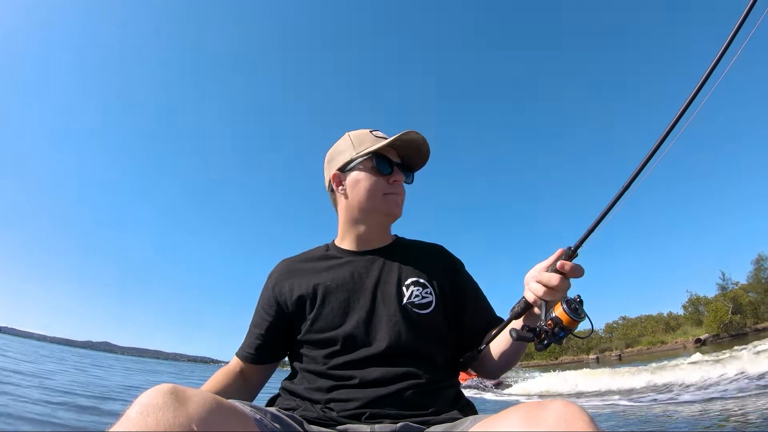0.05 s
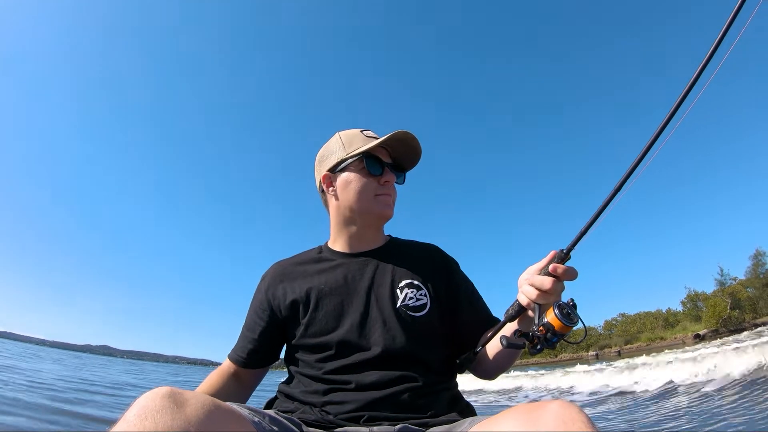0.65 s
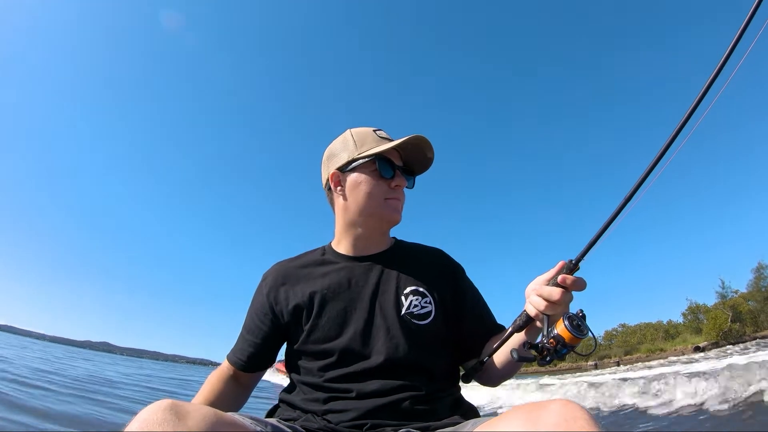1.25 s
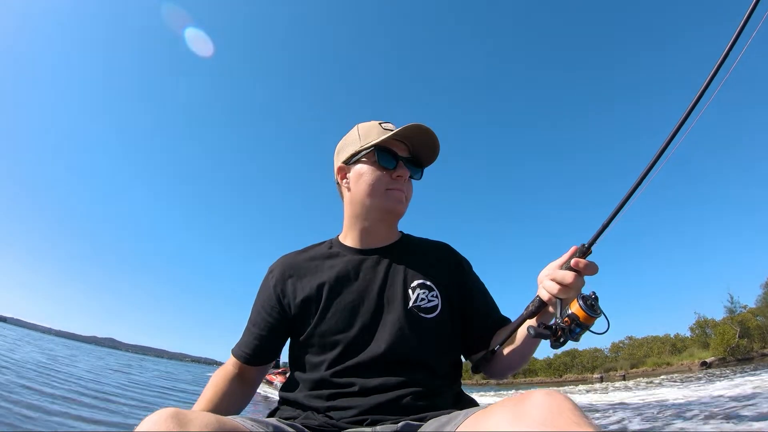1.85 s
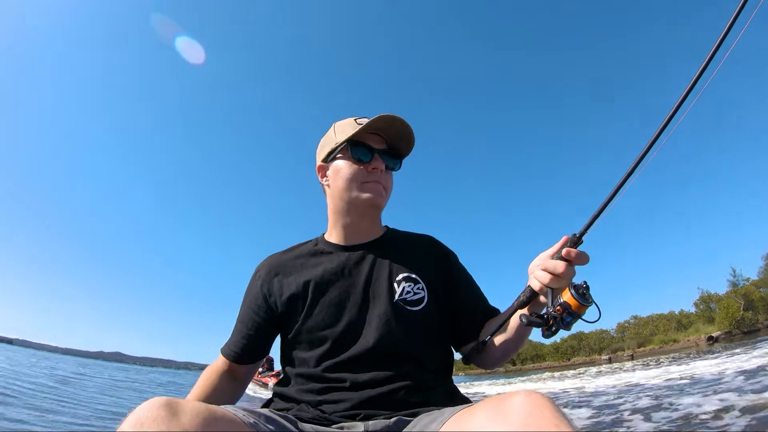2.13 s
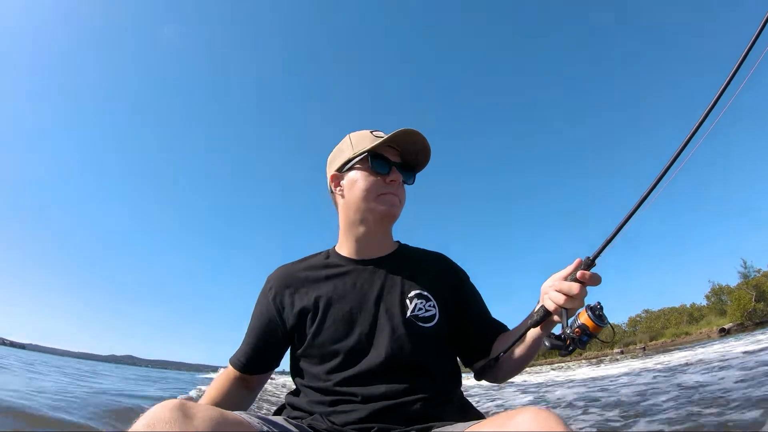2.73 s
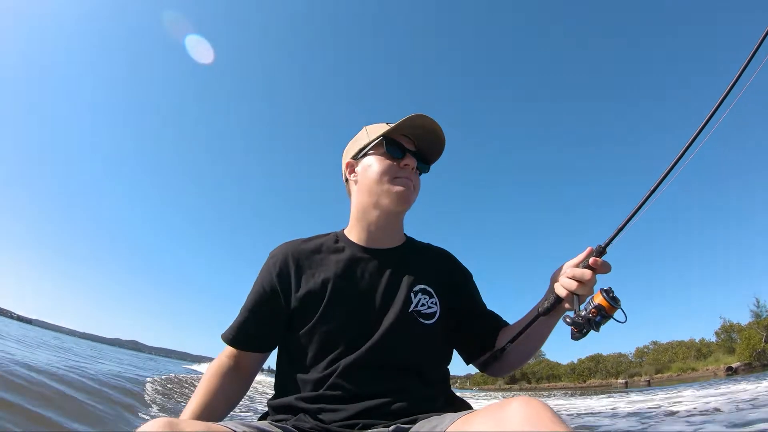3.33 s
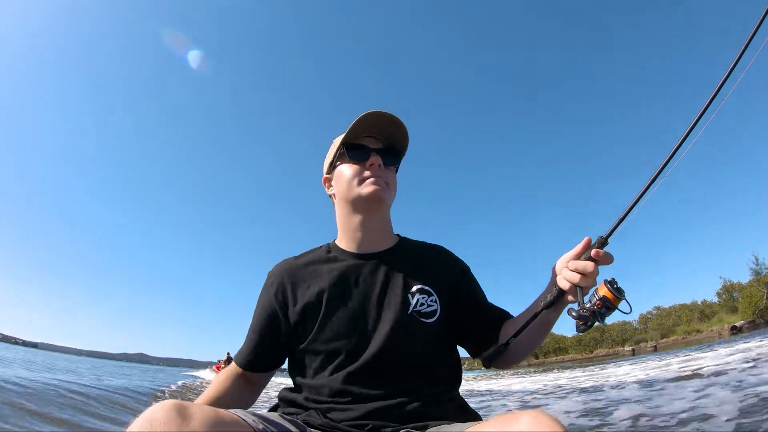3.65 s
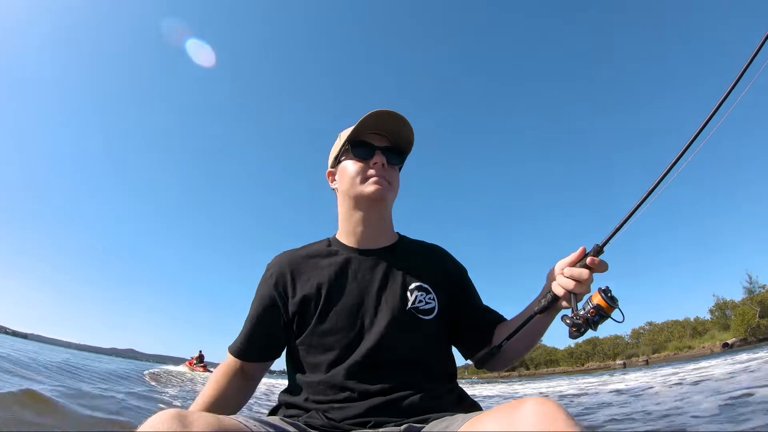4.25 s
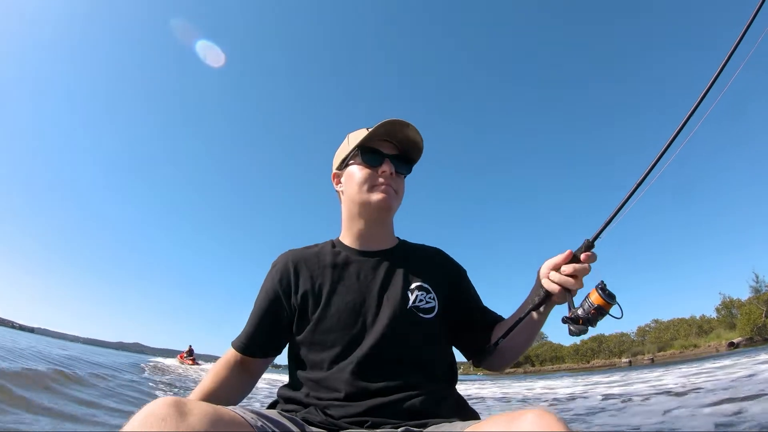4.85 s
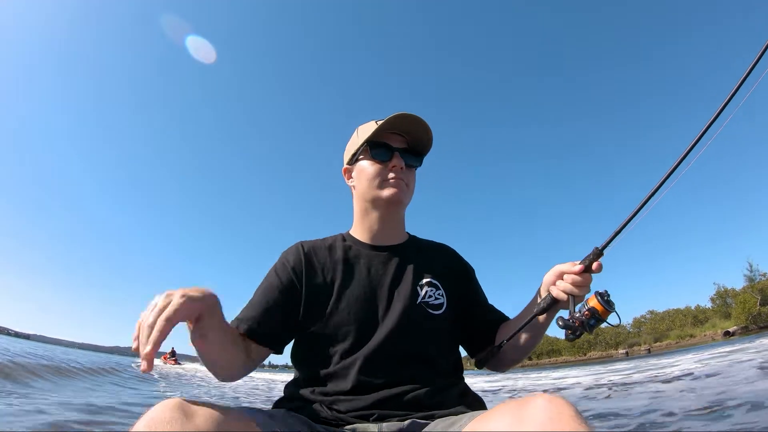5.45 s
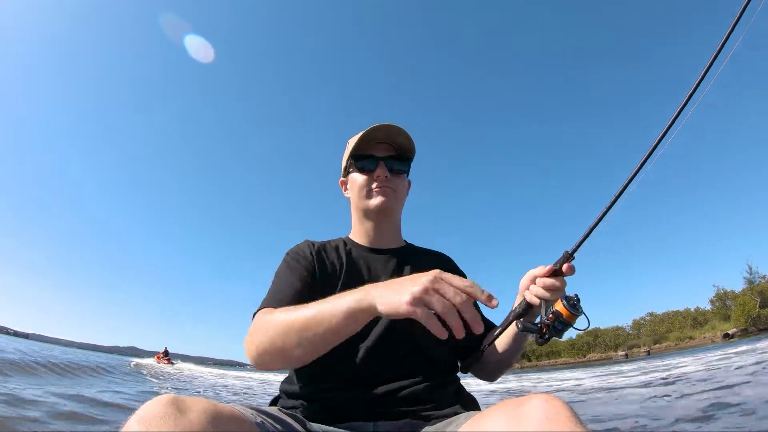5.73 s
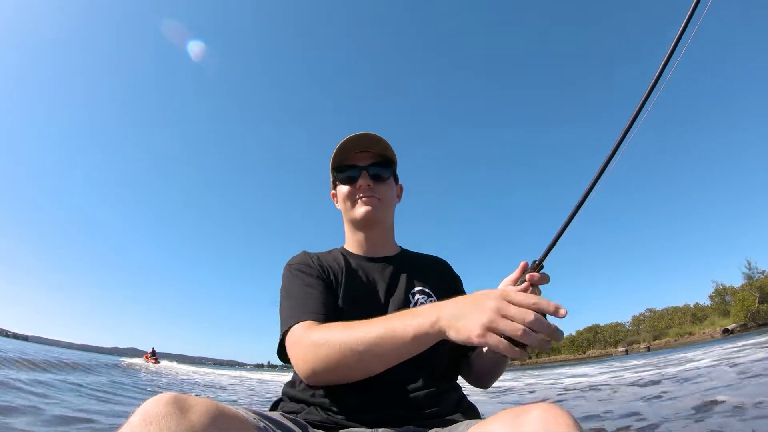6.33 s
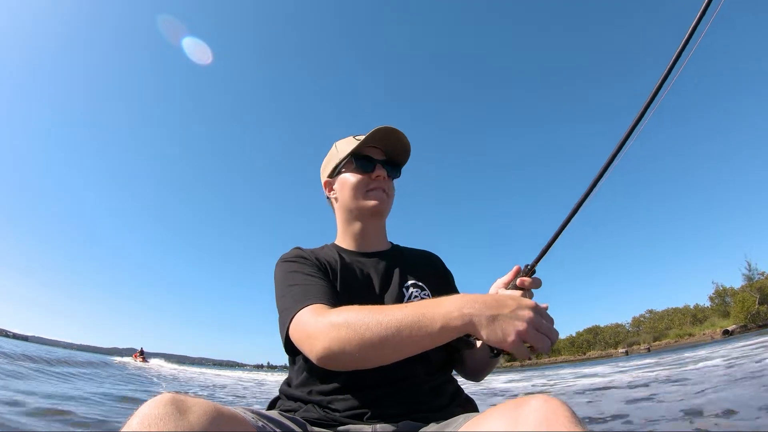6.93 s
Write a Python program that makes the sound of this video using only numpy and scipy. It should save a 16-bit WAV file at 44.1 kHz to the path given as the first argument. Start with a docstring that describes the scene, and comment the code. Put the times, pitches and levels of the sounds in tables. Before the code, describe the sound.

A passing jet ski hums and burbles into the distance, leaving a fizzing wake, while wind rumbles softly and a small bird trills.

```python
"""Jet ski passing a kayak

A three-cylinder jet ski passes close behind a drifting kayak and speeds off over open water, its
exhaust burbling through the water. Spray roars and hisses from left to right and leaves a fizzing
wake; the jet whistles briefly. A second engine drones farther away. Wind nudges the microphone,
small birds call and trill on the bank and a fishing reel clicks once."""
import sys
import numpy as np
from scipy import signal
from scipy.fft import rfft, irfft, next_fast_len
from scipy.io import wavfile
from scipy.ndimage import uniform_filter1d, minimum_filter1d

SR = 44100
rng = np.random.default_rng(int(sys.argv[2]) if len(sys.argv) > 2 else 0)


def inscribe(sig):
    """Save sig as 16-bit PCM at rate SR to the path in sys.argv[1].

    A 1-D sig is mono; a 2-D sig holds one channel per row.
    Samples are clipped to [-1, 1] before scaling.
    """
    pcm = np.round(np.clip(np.atleast_2d(sig).T, -1, 1) * 32767)
    wavfile.write(sys.argv[1], SR, pcm.astype(np.int16))


N = 312669
TIME = np.arange(N) / SR


def jet_ski():
    """Three firings per cycle give the strong lines; unequal cylinders fill in between."""
    # firing rate: t/s, f/Hz
    firing_rate = [(0, 90.2), (1.3, 91.5), (2.5, 92.7), (3.1, 95.2), (4, 98.1), (4.95, 99.6), (5.4, 98.6),
                   (5.8, 99.5), (6.15, 99.2), (7.09, 104.4)]
    # weak lines: cycle order, level/dB re a firing harmonic, number of that harmonic
    weak_lines = [(2, -24, 1), (4, -23, 1), (5, -40.5, 1), (7, -21, 1), (8, -6, 4), (10, -20.5, 4),
                  (11, -8.5, 4), (13, -27, 4), (14, -20.5, 3), (18, -37, 1), (21, -41, 1), (24, -32.5, 1)]
    firings = np.cumsum(curve(firing_rate)) / SR
    cycles = firings / 3
    levels_db = exhaust_levels_db()
    note = sum(gain_of(db) * partial(firings, k + 1, flutter=0.052) for k, db in enumerate(levels_db))
    note += sum(gain_of(db + levels_db[round(k) - 1]) * partial(cycles, order, flutter=0.26)
                for order, db, k in weak_lines)
    # only the shorter waves differ between the ears
    side = colour(note, [(100, -49), (280, -30), (370, -19), (550, -17.5)])
    # gas noise rings the pipe resonance that lifts harmonic 4
    resonance = [(80, -48), (220, -27), (320, 0), (390, 10), (425, -4.5), (480, -21.5), (1300, -110)]
    pipe = spread(noise_pair(), resonance) * gain_of(levels_db[3] - 13)
    return np.array([note + side, note - side]) + pipe


def exhaust_levels_db(broadside_m=9.6, stern_at_m=33.2, stern_reach_m=7.3, bounce_db=0.34):
    """Firing harmonics: 1-3 fade with distance and have broadside and stern lobes; 4 rings the pipe."""
    # harmonics 1-3: level/dB, loss/dB per distance doubling, broadside lobe/dB, stern lobe/dB
    harmonics = [(-11.5, 3, 0.85, 1.4), (-24.5, 1.14, 6.5, -1.5), (-35, 0.8, 16, 6.5)]
    # harmonic 4: t/s, level/dB
    pipe_level = [(0, -23), (.5, -30), (1, -32), (1.25, -24.5), (2.4, -24), (3.6, -29), (4.05, -36.5),
                  (5.3, -34), (7.09, -45)]
    along_m, doublings = course()
    broadside = np.exp(-(along_m / broadside_m) ** 2)
    stern = np.exp(-((along_m - stern_at_m) / stern_reach_m) ** 2)
    lower_db = [db + bounce_db * bounce() - loss_db * doublings + side_db * broadside + stern_db * stern
                for db, loss_db, side_db, stern_db in harmonics]
    return lower_db + [curve(pipe_level)]


def course(lag_s=0, pass_s=0.24, closest_m=13.64, speed_m_per_s=9.6):
    """Straight run: metres past the closest point, and doublings of the distance."""
    along_m = speed_m_per_s * (TIME - pass_s - lag_s)
    return along_m, np.log2(np.hypot(along_m, closest_m) / closest_m)


def bounce(landing_s=0.12, period_s=1.128):
    """Hull bouncing over the swell: -1 airborne, 1 on landing."""
    return np.cos(2 * np.pi * (TIME - landing_s) / period_s)


def burble():
    """Exhaust gas breaks through the water in low, irregular gulps."""
    # gulp spectrum: f/Hz, level/dB
    spectrum = [(20, -36.5), (45, -16), (75, -1), (115, -2), (160, -4), (280, -3), (340, -7), (410, -14),
                (460, -24), (600, -38.5), (1000, -79)]
    # envelope: t/s, level/dB
    level = [(0, -20), (1.3, -22.5), (2, -25), (2.8, -26.5), (3.6, -26.5), (4.5, -28), (5.5, -26.5),
             (7.09, -28)]
    gulps = noise_pair() * gain_of(1.17 * drift(16))
    return gain_of(curve(level)) * spread(gulps, spectrum)


def spray(wake_roar_db=-33.5, wake_roar_db_per_db=0.18):
    """Thrown water roars and hisses, then leaves a duller wake whose crest rolls towards the kayak."""
    # spray roar: f/Hz, level/dB
    roar_spectrum = [(200, -27.5), (400, 4.5), (500, -5.5), (620, 2), (770, 1.5), (900, -1.5), (1100, 1),
                     (1300, -3.5), (1600, -1), (2100, -10), (3200, -25), (10000, -84.5)]
    # wake roar: f/Hz, level/dB
    wake_spectrum = [(200, -37), (400, -5.5), (490, -4), (620, 1), (690, -1.5), (760, 2), (900, -4),
                     (1050, -3.5), (1250, -7), (1550, -9), (2100, -17.5), (3200, -28.5), (10000, -95)]
    # hiss of both: f/Hz, level/dB
    hiss_spectrum = [(700, -28.5), (1400, 0), (1900, 3), (2300, -1.5), (2700, 0), (3400, -4), (4200, -11),
                     (5500, -23), (9000, -28), (11500, -42), (15500, -59)]
    # hiss of the breaking crest: t/s, level/dB
    crest_level = [(0, -48.5), (2.2, -49.5), (3.5, -58.5), (4.7, -53.5), (5.4, -46), (6.4, -45.5),
                   (7.09, -50)]
    crest_db = curve(crest_level)
    wake_db = wake_roar_db + wake_roar_db_per_db * (crest_db - crest_db.mean())
    wake = gain_of(wake_db) * spread(noise_pair(), wake_spectrum)
    roar_gain = spray_gain(db=-28, db_per_doubling=11.5, lag_s=-0.12, surge_db=1.2)
    roar = (roar_gain * spread(noise_pair(), roar_spectrum) + wake) * gain_of(0.5 * drift(4.7))
    hiss_gain = spray_gain(db=-36.5, db_per_doubling=18.5, lag_s=0.13, surge_db=2.5)
    hiss = spread(droplets(per_s=2000, size_db=3, wash=1.1), hiss_spectrum) * gain_of(0.77 * drift(20))
    hiss *= np.hypot(hiss_gain, gain_of(crest_db))
    return panned(roar + hiss, water_pan_db())


def spray_gain(db, db_per_doubling, lag_s, surge_db):
    """Spray fades with distance and surges at each landing of the hull."""
    return gain_of(db - db_per_doubling * course(lag_s)[1] + surge_db * bounce())


def water_pan_db(near_db=7, far_db=-3.5):
    """Water sounds cross from left to right as the craft draws away."""
    nearness = 0.5 ** (2 * course()[1])
    return far_db + (near_db - far_db) * nearness


def splashes():
    """Sheets of spray fall back in grainy swells."""
    # sheets: t/s, level/dB, length/s
    sheets = [(1.3, -46, 0.28), (1.831, -40, 0.1), (1.917, -44, .1), (2.249, -39.5, 0.091)]
    envelope = np.zeros(N)
    for s, db, length_s in sheets:
        u = np.arange(SR) / SR / (length_s / 4)
        add(envelope, s, gain_of(db) * u * np.exp(1 - u))
    spectrum = [(200, -42), (800, -21), (2000, 0.5), (3000, -0.5), (5000, -9), (9000, -19.5),
                (11500, -41), (15000, -48)]
    return envelope * spread(droplets(per_s=2000, size_db=4.5, wash=0.93), spectrum)


def foam(gain_db=3, pan_share=0.3):
    """Tiny bubbles burst all over the wake."""
    # fizz: f/Hz, level/dB
    spectrum = [(1500, -12), (3000, 3), (4200, 2), (5500, -1.5), (7000, -1), (9200, -2.5), (10100, -9.5),
                (11300, -19.5), (13000, -22.5), (15500, -29)]
    # envelope: t/s, relative level/dB
    level = [(0.05, -48), (1.47, -51), (1.66, -53.5), (2.26, -53), (3.06, -56.5), (3.72, -54),
             (4.24, -56.5), (5.06, -53), (6.3, -51), (7.02, -56)]
    fizz = spread(droplets(per_s=2500, size_db=1.5, wash=1.8), spectrum)
    fizz *= gain_of(curve(level) + gain_db + 0.66 * drift(23))
    return panned(fizz, pan_share * water_pan_db())


def mist(db=-54, peak_s=0.35, fade_db_per_s=7):
    """The finest drops crackle while the craft is near; air soon absorbs their treble."""
    spectrum = [(200, -62.5), (5000, -18.5), (8000, -2), (9200, 3.5), (10200, -2), (11200, -13),
                (13000, -11), (15500, -22.5)]
    crackle = spread(droplets(per_s=1100, size_db=5.5, wash=0.8), spectrum)
    return crackle * gain_of(db - fade_db_per_s * abs(TIME - peak_s) + 2 * drift(12))


def whistle(level_db=-51, hold_from_s=2.6, hold_to_s=2.87, rise_db_per_s=19, fall_db_per_s=23):
    """Rushing water rings the jet's narrow resonances, heard while the nozzle faces the kayak."""
    # resonances: f/Hz, width/Hz, relative level/dB
    resonances = [(3650, 500, -2), (4600, 380, -1.5), (6760, 600, -12)]
    rush, tone = rng.standard_normal(N), np.zeros(N)
    for hz, width_hz, db in resonances:
        pole = resonator(hz, width_hz)
        tone += gain_of(db) * evened(signal.lfilter([1], np.convolve(pole, pole), rush).real)
    envelope_db = level_db - rise_db_per_s * np.maximum(hold_from_s - TIME, 0)
    envelope_db -= fall_db_per_s * np.maximum(TIME - hold_to_s, 0)
    return panned(tone * gain_of(envelope_db + 0.74 * drift(17)), pan_db=3)


def far_engine():
    """A second engine's lumpy drone beats against the jet ski's note."""
    # cycle rate: t/s, f/Hz
    cycle_rate = [(0, 18.65), (2, 18.4), (3.5, 18.13), (5, 17.95), (6, 17.79), (7.09, 17.71)]
    # envelope: t/s, level/dB
    level = [(0, -27.5), (1.5, -32), (3, -24), (4.5, -22), (7.09, -19.5)]
    # lines: cycle order, relative level/dB
    lines = [(3, -24.5), (4, -13), (5, -1.5), (6, -14), (7, -0.5), (8, -12), (10, -18), (13, -18.5),
             (14, -23), (17, -21), (19, -22)]
    cycles = np.cumsum(curve(cycle_rate)) / SR
    note = sum(gain_of(db) * partial(cycles, order, flutter=0.16) for order, db in lines)
    return gain_of(curve(level)) * note


def wind(breeze_db=-37):
    """Low pressure rumble, partly different at each microphone port; gusts swell over a breeze."""
    # rumble: f/Hz, level/dB
    spectrum = [(10, -25.5), (22, 0.5), (30, 6), (55, 6), (80, 4.5), (140, 5), (400, -55), (1500, -110)]
    # gusts: peak t/s, level/dB, length/s
    gusts = [(2.97, -24.5, 1), (4.094, -22.5, 1), (4.903, -25, 0.6), (5.424, -31, 0.93)]
    mid, side = colour(noise_pair(), spectrum)
    side = colour(side, [(25, -1.5), (40, -5.5), (60, 1), (120, -6.5)])
    rumble = np.array([mid + side, mid - side]) / np.std(mid)
    swells = sum(gain_of(db) * np.cos(np.pi * np.clip((TIME - s) / length_s, -0.5, 0.5))
                 for s, db, length_s in gusts)
    return panned(rumble, pan_db=6.5) * np.hypot(swells, gain_of(breeze_db))


def drops_and_reel():
    """Large drops land nearby and the reel clicks: short, broadly pitched cracks."""
    # drops: t/s, relative level/dB, f/Hz, t60/s
    drops = [(.363, -44, 9000, .02), (.519, -41, 4000, .015), (.893, -32, 3400, .03), (.92, -37, 8800, .02),
             (.965, -36, 9200, .025), (1.47, -32, 3570, .02)]
    # reel click: t/s, relative level/dB, f/Hz, t60/s
    reel = [(6.852, -38, 8800, .026)]
    t = np.arange(SR // 10) / SR
    cracks = np.zeros(N)
    for s, db, hz, t60_s in drops + reel:
        ring = signal.lfilter([1], resonator(hz, width_hz=1500), rng.standard_normal(len(t))).real
        add(cracks, s, gain_of(db - 60 * t / t60_s) * evened(ring) / 2)
    return colour(cracks, [(9500, 3), (12000, -6), (15000, -16)])


def birds(echo_db=-9, echo_t60_s=0.12):
    """Each note hooks over its top pitch and slides down; trees scatter a faint echo."""
    # single calls: t/s, level/dB, top f/Hz, end f/Hz, length/s
    calls = [(3.825, -43, 2880, 2500, .018), (4.146, -53, 5120, 4900, .018), (4.806, -55, 5100, 4100, .02),
             (5.137, -44, 4350, 4150, .013), (5.32, -44, 3330, 2600, 0.022), (5.404, -44, 5100, 3900, 0.02),
             (5.482, -45, 3330, 2600, .02)]
    song = np.zeros(N)
    for s, db, top_hz, end_hz, length_s in calls + trill():
        u = np.linspace(0, 1, round(length_s * SR))
        fallen = np.interp(u, [0, 0.16, 0.36, 0.54, 0.76, 1], [0.28, 0, 0.06, 0.5, 0.84, 1])
        hz = top_hz + (end_hz - top_hz) * fallen
        envelope = gain_of(db - 4.4 * u) * signal.windows.tukey(len(u), 0.35)
        add(song, s, envelope * np.sin(2 * np.pi * np.cumsum(hz) / SR))
    song *= gain_of(2.2 * drift(90))  # level flicker
    t = np.arange(SR // 3) / SR
    trees = rng.standard_normal((2, len(t))) * gain_of(-60 * t / echo_t60_s)
    echo = signal.fftconvolve(song[None], trees / np.linalg.norm(trees[0]), axes=1)[:, :N]
    return panned(song, pan_db=9.5) + gain_of(echo_db) * echo


def trill(count=11, start_s=5.632, step_s=0.0854, note_s=0.025):
    """Evenly spaced bird notes that swell, then hold, while their pitch traces one arch."""
    full_db, full_s, swell_db_per_s = -36, 5.92, 20
    crest_hz, crest_s, sag_hz_per_s2, end_hz = 3675, 6.13, 1800, 2420
    s = start_s + step_s * np.arange(count)
    db = full_db - swell_db_per_s * np.maximum(full_s - s, 0)
    top_hz = (crest_hz - sag_hz_per_s2 * (s - crest_s) ** 2) * (1 + 0.02 * rng.standard_normal(count))
    return [(*note, end_hz, note_s) for note in zip(s, db, top_hz)]


def partial(turns, order, flutter):
    """One engine order, shaken in level and phase by the chop under the exhaust."""
    shake = flutter * (drift(8) + 1j * drift(7.9))
    phase = 2 * np.pi * (order * turns + rng.random())
    return np.sqrt(2) * ((1 + shake) * np.exp(1j * phase)).real


def droplets(per_s, size_db, wash):
    """Two trains of bursting drops of unequal size over a wash of tiny ones."""
    sizes = gain_of(size_db * np.minimum(rng.exponential(1, (2, N)), 5))
    signs = rng.choice([-1, 1], (2, N))
    hits = rng.random((2, N)) < per_s / SR
    return evened(sizes * signs * hits) + wash * noise_pair()


def spread(pair, spectrum):
    """Two unrelated signals as mid (rms 1) and side of one wide, coloured sound."""
    # stereo width: f/Hz, side re mid/dB
    width = [(70, -10.5), (130, -22.5), (300, -25), (430, -5.5), (540, -9), (680, -8.5), (950, -3.5),
             (1500, -6), (2500, -3), (4000, -5), (6000, 0.5), (8500, 2.5), (11000, 3), (14000, -6.5)]
    mid, side = colour(pair, spectrum)
    side = colour(side, width)
    return np.array([mid + side, mid - side]) / np.std(mid)


def colour(x, spectrum):
    """Filter by rows of f/Hz, level/dB."""
    hz, db = np.transpose(spectrum)
    size = next_fast_len(N)
    bins_hz = np.arange(size // 2 + 1) * SR / size
    response = gain_of(np.interp(np.log(bins_hz + 1), np.log(hz), db))
    return irfft(rfft(x, size) * response, size)[..., :N]


def drift(rate_hz):
    """Smooth random motion of rms 1, rolling off above rate_hz."""
    hop = 64
    frames = N // hop + 2
    hz = np.fft.rfftfreq(frames, hop / SR)
    slow = irfft(rfft(rng.standard_normal(frames)) * np.exp(-(hz / rate_hz) ** 2), frames)
    return evened(np.interp(np.arange(N) / hop, np.arange(frames), slow))


def resonator(hz, width_hz):
    """Denominator of a complex one-pole filter."""
    return [1, -np.exp(-np.pi * width_hz / SR) * np.exp(2j * np.pi * hz / SR)]


def panned(x, pan_db):
    """Left louder than right by pan_db."""
    return x * gain_of(np.array([pan_db, -pan_db]).reshape(2, -1) / 2)


def curve(rows):
    """Rows of t/s, value, interpolated to every sample."""
    return np.interp(TIME, *np.transpose(rows))


def add(mix, start_s, sound):
    """Mix in place at start_s."""
    part = mix[round(start_s * SR):][:len(sound)]
    part += sound[:len(part)]


def noise_pair():
    """Two unrelated white noises."""
    return rng.standard_normal((2, N))


def gain_of(db):
    """dB to amplitude."""
    return 10 ** (np.asarray(db) / 20)


def evened(x):
    """Scale to rms 1."""
    return x / np.sqrt(np.mean(x ** 2) + 1e-20)


def scene():
    """Stereo mix at the kayak."""
    engines = jet_ski() + far_engine() + burble()
    water = spray() + splashes() + foam() + mist() + whistle()
    return engines + water + wind() + drops_and_reel() + birds()


def record(dry):
    """Smooth peak limiter, then low-pass."""
    ceiling, span_samples, cutoff_hz = 0.78, 1100, 15700
    allowed = np.minimum(1, ceiling / (abs(dry).max(0) + 1e-9))
    gain = uniform_filter1d(minimum_filter1d(allowed, span_samples), span_samples)
    lowpass = signal.firwin(511, cutoff_hz, window=("kaiser", 9), fs=SR)
    return signal.oaconvolve(dry * gain, lowpass[None], "same")


dry = scene()
out = record(dry)
inscribe(out)
```